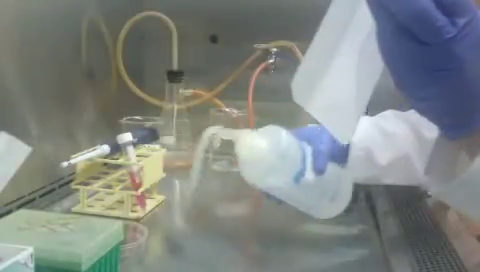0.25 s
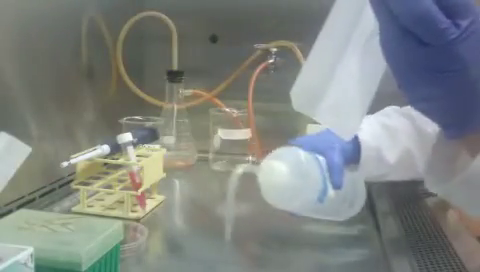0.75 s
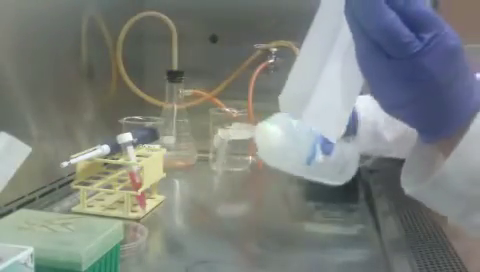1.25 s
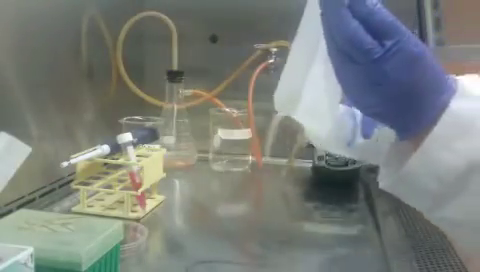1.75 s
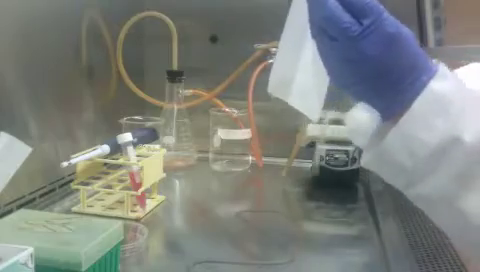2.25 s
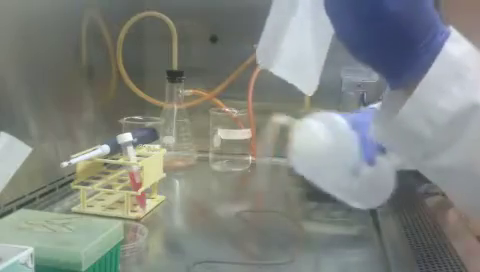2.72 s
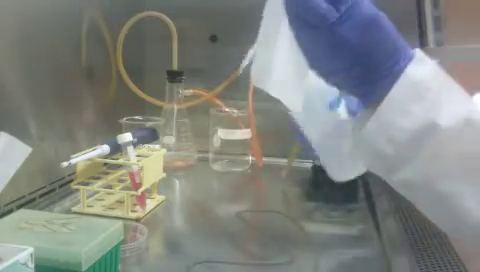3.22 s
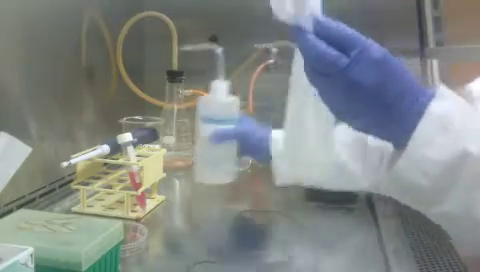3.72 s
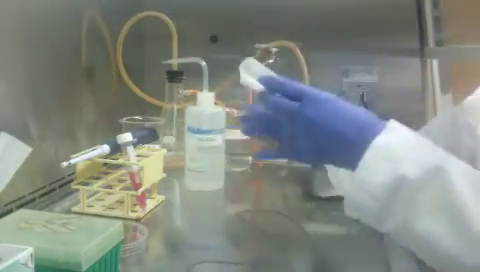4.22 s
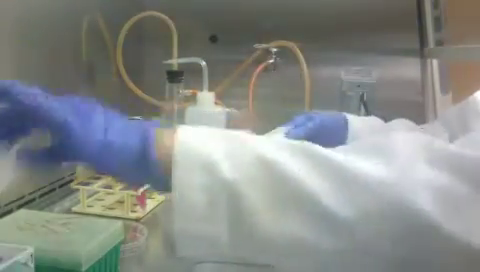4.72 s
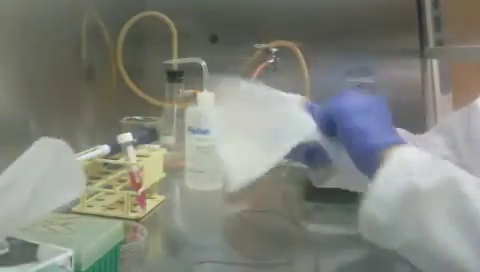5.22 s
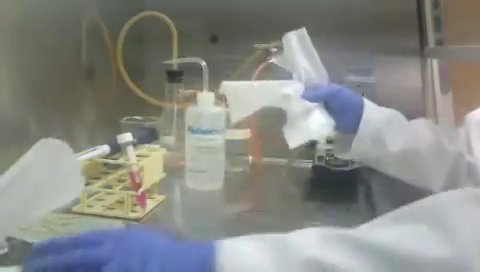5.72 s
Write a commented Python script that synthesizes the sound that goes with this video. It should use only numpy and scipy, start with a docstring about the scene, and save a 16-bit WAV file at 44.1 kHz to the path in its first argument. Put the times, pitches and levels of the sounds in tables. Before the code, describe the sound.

A fan rushes steadily inside a steel lab cabinet. Close by, a plastic wash bottle sputters and spits, liquid patters faintly on the work surface, and air bubbles back in through the nozzle. The bottle is set down hard, and the steel booms loudly enough to overload the microphone. A paper towel then rustles in three quick pulls and scrapes briefly across the surface.

```python
"""Over the rush of a steel lab cabinet's fan, a wash bottle sputters as air and liquid leave its nozzle,
squirts onto the work surface and gulps air back in a froth of bubbles. The bottle is put down hard and the
steel sheet booms, overloading the microphone. Then a paper towel is pulled three times, its fibres rustling and
its taut sheet drumming, and is rubbed across the surface; a gloved hand drags over the steel with a chatter and
a scrape."""
import sys
import numpy as np
from scipy import signal
from scipy.fft import rfft, irfft, next_fast_len
from scipy.io import wavfile
from scipy.ndimage import uniform_filter1d

SR = 44100
rng = np.random.default_rng(int(sys.argv[2]) if len(sys.argv) > 2 else 0)


def log_audio(samples):
    """Write samples as a 16-bit WAV file to the path given in sys.argv[1]."""
    # one column per channel
    frames = np.atleast_2d(samples).T
    # limit to full scale, then quantise
    limited = np.clip(frames, -1, 1)
    pcm = np.round(limited * 32767).astype(np.int16)
    wavfile.write(sys.argv[1], SR, pcm)


N = 263277
TIME = np.arange(N) / SR


def sputter():
    """Air and liquid leave the nozzle in uneven bursts, swelling as the squeeze builds."""
    # sputter spectrum: f/Hz, level/dB per Hz
    spectrum = [(100, -29), (200, -16), (340, -2.5), (520, -0.5), (800, -6), (1200, -8.5), (1700, -1.5),
                (2200, -8.5), (3100, -3), (4600, -13.5), (9000, -15.5), (12000, -23.5), (15500, -38)]
    start_s, length_s, final_db, swell_db_per_s = .5474, .1042, -21, 110
    jump_s, jump_db = .028, 7  # the flow breaks through in two jumps
    bursts = unit(grains(rate=7000, spread_db=0))
    bursts += pings(rate=2500, lo_hz=290, hi_hz=15500, cycles=15, glide=.05, spread_db=0)
    surges = undb(2.2 * walk(330))
    elapsed = np.clip(TIME - start_s, 0, length_s)
    jumps_left = np.maximum(2 - elapsed // jump_s, 0)
    squeeze = undb(final_db - swell_db_per_s * (length_s - elapsed) - jump_db * jumps_left)
    envelope = squeeze * stroke(start_s, length_s, attack_s=.006, release_s=.034)
    return colour(bursts * surges, spectrum) * envelope


def jet():
    """The thin jet hisses on the steel as a fine spray."""
    # squirts: t/s, length/s, level/dB
    squirts = [(0.836, .01, -45), (1.647, 0.041, -63), (2.057, .09, -64), (2.33, 0.32, -67)]
    flow = sum(undb(db) * stroke(s, length, attack_s=.091, release_s=.067) for s, length, db in squirts)
    return unit(cut(grains(rate=9000, spread_db=2.5), [3500, 12000], "bandpass")) * flow


def drops():
    """Drops patter faintly on the steel while the bottle is in use."""
    patter = pings(rate=260, lo_hz=1500, hi_hz=10000, cycles=40, glide=.02, spread_db=3)
    return patter * undb(-69.5) * stroke(1.0, length_s=1.63, attack_s=.5, release_s=.5)


def gulp():
    """Air drawn back into the bottle: a froth of chirping bubbles swells and dies away."""
    # gulp spectrum: f/Hz, level/dB per Hz
    spectrum = [(600, -26), (1150, -3.5), (1560, 1), (2200, -4.5), (2950, -2.5), (4000, -15), (5500, -16.5),
                (7000, -25), (10000, -33), (13000, -43)]
    froth = pings(rate=2600, lo_hz=1100, hi_hz=12000, cycles=28, glide=.04, spread_db=3)
    return colour(froth, spectrum) * undb(-36) * stroke(3.29, length_s=0, attack_s=.13, release_s=.24)


def spits():
    """Air pockets blow out of the nozzle, each a wet pop with a bright spray."""
    # air pockets: t/s, level/dB, centre f/Hz, spray against the pop/dB, t60/s
    pockets = [(.576, -30.5, 3230, -6.5, 0.038), (.707, -34, 3000, 5.5, 0.14),
               (.843, -27, 4890, -10, 0.062), (.852, -29, 3220, 7.5, .051), (1.004, -27.5, 4040, -6, 0.053),
               (2.053, -43, 1840, -20, 0.086)]
    out = np.zeros(N)
    for s, db, hz, spray_db, t60 in pockets:
        spray = unit(cut(rng.standard_normal(SR // 5), [5350, 11300], "bandpass"))
        spit = pop(hz, width=.38, splash_db=-3.5) + undb(spray_db) * spray
        add(out, s, undb(db) * dying(spit, t60))
    return out


def bubbles():
    """Single bubbles burst in the nozzle and tube with narrow, pitched pops."""
    # bursts: t/s, level/dB, centre f/Hz
    bursts = [(.086, -47.5, 2610), (2.45, -28.5, 7300), (3.005, -44, 2100), (3.091, -30.5, 2690),
              (3.178, -36, 1800), (3.242, -35, 2000), (3.211, -34, 5280), (3.213, -33, 1940),
              (3.259, -41, 5560), (3.277, -29, 2400), (3.293, -25.5, 2800), (3.294, -38, 5200)]
    out = np.zeros(N)
    for s, db, hz in bursts:
        add(out, s, undb(db) * dying(pop(hz, width=.14, splash_db=-12), t60=.043))
    return out


def wall_thump():
    """The squeezed bottle wall flexes with one low, damped note."""
    start_s, db, hz, t60 = .723, -23.5, 281, .066
    out, size = np.zeros(N), SR // 5
    flex = np.sin(2 * np.pi * hz * TIME[:size]) * fade(t60, size)
    add(out, start_s, undb(db) * flex)
    return out


def wash_bottle():
    """All the bottle's squeezing and breathing, thinned in the bass, between the cabinet walls."""
    bottle = sputter() + jet() + drops() + gulp() + spits() + bubbles() + wall_thump()
    return cabinet(cut(bottle, 184, "highpass"), wet_db=-3)


def steel(clear_db):
    """The work surface rings from one blow: clear modes over a crowd of close ones, treble dying first."""
    # clear modes: f/Hz, level/dB, t60/s
    clear_modes = [(102, -11.5, 0.74), (159, -5.5, 0.475), (206.4, -3.5, 0.42), (246.7, -0.5, 0.3),
                   (271, 2.5, 0.42), (405.5, -9.5, 0.55), (454, -13.5, 0.45), (522, -8, 0.39),
                   (636, -1.5, 0.21), (717, -8, 0.44), (751, -12, 0.38), (850.7, -6.5, 0.66),
                   (878, -22.5, 1.4), (1008, -14, 0.43), (1189, 1, 0.3), (1322, -7, 0.24), (2400, -11, .27),
                   (2618, -5, 0.27)]
    # crowd of close modes: f/Hz, level/dB per Hz, t60/s
    close_modes = [(30.2, -40, 0.41), (60, -12, 0.7), (109, -8, 0.73), (236, -1.5, 0.62), (410, -2.5, 0.46),
                   (654, -4.5, 0.43), (985, -4.5, 0.38), (1600, -8.5, 0.29), (2850, -8.5, 0.28),
                   (5050, -12.5, 0.25), (9500, -11.5, 0.13), (12900, -15.5, 0.077), (16000, -29.5, 0.16)]
    size, edges_hz = SR, np.geomspace(28, 17000, 27)
    crowd, power = 0, 0
    for lo, hi in zip(edges_hz, edges_hz[1:]):
        hz = np.sqrt(lo * hi)
        weight = undb(along(hz, close_modes)) * np.sqrt(hi - lo)
        band = unit(cut(rng.standard_normal(size), [lo, hi], "bandpass", order=3))
        crowd += weight * band * fade(along(hz, close_modes, column=2), size)
        power += weight ** 2
    clear = sum(undb(db) * np.sin(2 * np.pi * hz * TIME[:size]) * fade(t60, size)
                for hz, db, t60 in clear_modes)
    return crowd / np.sqrt(power) + undb(clear_db) * clear


def blows(contacts, low_cut_hz):
    """Contacts on the work surface; a softer one leaves the treble out, a lighter one the bass."""
    out = np.zeros(N)
    for s, db, brightness_hz in contacts:
        add(out, s, undb(db) * cut(steel(clear_db=-9), brightness_hz, "lowpass"))
    return cut(out, low_cut_hz, "highpass", order=3)


def knocks():
    """The bottle lands and rocks, booming the steel; later a hand bumps the steel with a soft, low thud."""
    # hard and soft contacts: t/s, level before filtering/dB, low-pass f/Hz
    contacts = [(3.961, -13, 2500), (3.968, -8, 12100), (3.974, -7.5, 16000), (3.985, -7, 11900),
                (3.998, -11.5, 5000), (5.17, -41, 210)]
    return blows(contacts, low_cut_hz=85)


def splats():
    """Liquid slaps the steel: soft, light contacts with a dull ring."""
    # wet slaps: t/s, level before filtering/dB
    slaps = [(.724, -37), (.853, -40.5), (0.916, -43), (1.014, -39.5), (2.06, -45.5), (2.14, -41),
             (2.334, -42.5), (2.53, -48.5)]
    brightness_hz = 840
    return blows([(s, db, brightness_hz) for s, db in slaps], low_cut_hz=218)


def paper_fibres():
    """Fibres snap in clusters and small folds crinkle; gives a steady crackle and the hiss above it."""
    # paper spectrum: f/Hz, level/dB per Hz
    spectrum = [(530, -17.5), (900, 0), (955, -8.5), (1260, -5.5), (1470, -6.5), (2120, -4), (2450, -2.5),
                (3460, -1), (4770, -8.5), (5180, -9), (8550, -16), (9860, -12), (15500, -35)]
    jerks = undb(1.54 * walk(200))
    snaps = unit(grains(rate=9000, spread_db=3.5))
    folds = pings(rate=2200, lo_hz=913, hi_hz=15030, cycles=34, glide=0, spread_db=.5)
    fibres = colour((snaps + undb(-2.5) * folds) * jerks, spectrum)
    crackle = unit(cut(fibres, [900, 6000], "bandpass", order=3))
    hiss = unit(cut(fibres, 5800, "highpass", order=3))
    return crackle, hiss


def paper_drum():
    """Countless tugs make the taut sheet drum; it stiffens as it moves, evening out its largest swings."""
    # paper sheet modes: f/Hz, width/Hz, level/dB
    modes = [(167, 47, -13), (368, 50, -11), (408, 46, -6.5), (519, 31, -1), (642, 43, 2), (697, 36, -7.5),
             (875, 66, -35), (1214, 31, -13)]
    tugs = cut(grains(rate=4000, spread_db=2), [300, 1300], "bandpass")
    swing = np.tanh(.6 * unit(ring(tugs, modes)))
    return unit(cut(swing, 120, "highpass"))


def towel():
    """In each pull the paper catches, rustles and drums, then whips free."""
    # pulls: t/s, length/s, level/dB, attack/s, release/s, drumming against the crackle/dB
    pulls = [(4.366, 0.083, -31.5, 0.028, 0.046, -15.5), (4.82, 0.15, -23, 0.057, 0.076, 8),
             (5.35, 0.03, -35.5, 0.11, 0.11, -11)]
    hiss_db, hiss_rise_db, crackle_fall_db, drum_arch_db = -2.5, 1, .5, 5.5
    catch_lead_s, catch_db = .0096, -6
    taut_pitch, pitch_sag = 1.04, .09  # shares of the resting pitch
    crackle, hiss = paper_fibres()
    drumming = paper_drum()
    rustle, drum = 0, 0
    for s, length, db, attack, release, drum_db in pulls:
        progress = np.clip((TIME - s) / length, 0, 1)
        whip = progress ** 4
        paper = crackle * undb(-crackle_fall_db * (progress - .5))
        paper += hiss * undb(hiss_db + hiss_rise_db * whip)
        catch = undb(catch_db) * stroke(s - catch_lead_s, length_s=0, attack_s=.0037, release_s=.023)
        rustle += undb(db) * (paper * stroke(s, length, attack, release) + crackle * catch)
        # the sheet sinks in pitch as it slackens and drums hardest in mid-pull
        sagging_time = np.cumsum(taut_pitch - pitch_sag * progress) / SR
        sheet = np.interp(sagging_time, TIME, drumming, period=N / SR)
        arch = undb(drum_db - drum_arch_db * (2 * progress - 1) ** 2)
        drum += undb(db) * arch * sheet * stroke(s, length, attack_s=.067, release_s=.095)
    return cabinet(rustle, wet_db=-9.5) + drum


def wipe():
    """A gloved hand lands on the steel: it chatters as it lands and scrapes briefly as it is pushed off."""
    # scrape spectrum: f/Hz, level/dB per Hz
    spectrum = [(88, -55), (150, -27), (239, -0.5), (550, -12), (668, -9), (1020, -38), (1170, -17),
                (1540, 0.5), (1940, -12.5), (3100, 1), (3760, -8), (9920, -15), (14300, -29), (15500, -43)]
    # chatter resonances: f/Hz, width/Hz, level/dB
    resonances = [(513, 36, 1.5), (710, 140, 5), (1175, 57, -1.5), (2610, 240, 3), (3340, 320, -2)]
    land_s, push_delay_s = 5.817, .013
    slips = grains(rate=2500, spread_db=0) * undb(3.4 * walk(90))
    push = undb(-26) * stroke(land_s + push_delay_s, length_s=.017, attack_s=.033, release_s=.078)
    slide = undb(-33.5) * stroke(land_s, length_s=0, attack_s=.02, release_s=.43)
    scrape = colour(slips, spectrum) * push
    chatter = unit(cut(ring(slips, resonances), [300, 4000], "bandpass")) * slide
    return scrape + chatter


def ticks():
    """Plastic and paper creases give short, bright snaps with no bass."""
    # snaps: t/s, level of the first 10 ms/dB, high-pass f/Hz, t60/s
    snaps = [(.058, -30.5, 10200, 0.0024), (4.056, -27, 6000, 0.15), (4.264, -44.5, 8460, 0.1),
             (5.196, -39, 1460, 0.071)]
    out, size = np.zeros(N), SR // 5
    for s, db, hz, t60 in snaps:
        snap = rng.standard_normal(size) * fade(t60, size)
        snap = cut(cut(snap, hz, "highpass", order=8), 8200, "lowpass")
        onset_rms = np.sqrt(np.mean(snap[:SR // 100] ** 2))
        add(out, s, undb(db) * snap / onset_rms)
    return cabinet(out, wet_db=-12)


def brushing():
    """Sleeve and towel brush softly with each reach of the arm."""
    # reaches: t/s, length/s, level/dB
    reaches = [(3.843, 0.47, -50.5), (4.545, 0.41, -47.5), (5.089, 0.052, -44), (5.254, 0.27, -49)]
    # brushing spectrum: f/Hz, level/dB per Hz
    spectrum = [(80, -7), (200, 14.5), (450, -1), (800, 2.5), (1500, -2), (3200, 0), (6000, -4.5),
                (10000, -11), (15500, -31)]
    motion = sum(undb(db) * stroke(s, length, attack_s=.17, release_s=.27) for s, length, db in reaches)
    friction = grains(rate=6000, spread_db=6) * undb(.98 * walk(37))
    return colour(friction, spectrum) * motion


def fan():
    """A bed of rushing air that wavers a little, with quickly fluttering tones from the blower."""
    # air spectrum: f/Hz, level/dB per Hz
    spectrum = [(25, -64), (45, -14), (70, -13.5), (160, 0.5), (240, -1.5), (330, -8), (600, -15),
                (1050, -12.5), (1500, -19), (2800, -20), (5000, -24.5), (8000, -28), (11000, -35),
                (15500, -51)]
    # blower tones: f/Hz, wander/Hz, level/dB
    whine = [(245.7, 4.8, -59), (1095, 14.2, -65), (4126, 14, -65), (5330, 26, -72.5), (7600, 74, -73),
             (12250, 40, -84)]
    # recorder gain on the fan's rush and whine, quieter at first, then settling: t/s, level/dB
    gain_curve = [(0, -52.5), (.5, -55), (.7, -49.5), (2.4, -50), (2.9, -51), (3.6, -49), (5.97, -50.5)]
    air = colour(rng.standard_normal(N), spectrum) * undb(1.23 * walk(31))
    tones = 0
    for hz, wander, db in whine:
        phase = 2 * np.pi * np.cumsum(hz + wander * walk(110)) / SR
        flutter = undb(3 * walk(55))
        tones += undb(db) * unit(np.sin(phase) * flutter)
    recorder_gain = gain(gain_curve)
    return air * recorder_gain + tones * unit(recorder_gain)


def cabinet(x, wet_db):
    """Close steel walls: four early reflections colour the sound and a short echo follows."""
    size, t60, predelay_s = SR // 3, .15, .002
    tail = rng.standard_normal(size) * fade(t60, size) * (TIME[:size] > predelay_s)
    walls = tail / np.linalg.norm(tail)
    early = rng.integers(SR // 2000, SR // 200, size=4)
    walls[early] += .47 * rng.choice([-1, 1], size=4)
    echo = signal.fftconvolve(x, walls / np.linalg.norm(walls))[:N]
    return (x + undb(wet_db) * echo) / np.sqrt(1 + undb(2 * wet_db))


def pop(hz, width, splash_db):
    """Noise rings in a small wet cavity, inside a broad splash; width is a share of the centre pitch."""
    burst = rng.standard_normal(SR // 5)
    cavity = unit(cut(burst, [hz * (1 - width / 2), hz * (1 + width / 2)], "bandpass"))
    splash = unit(cut(cut(burst, hz / 3, "highpass"), hz + 2500, "lowpass", order=5))
    return cavity + undb(splash_db) * splash


def pings(rate, lo_hz, hi_hz, cycles, glide, spread_db):
    """Tiny ringing grains, rate per second, each with its own pitch, which glide bends up as it dies."""
    candidates = 24000
    at, pitch, chance = rng.random((candidates, 3)).T
    strength = undb(spread_db * rng.standard_normal(candidates).clip(-2, 2))
    heard = chance < rate * N / SR / candidates
    hz = lo_hz + (hi_hz - lo_hz) * pitch[heard, None]
    step = np.arange(SR // 120)
    turns = hz * step / SR
    age = turns / cycles
    chirp = np.sin(2 * np.pi * turns * (1 + glide * np.minimum(age, 2) / 2))
    decay = np.exp(-np.pi * age) * (1 - step / len(step))
    sound = strength[heard, None] * np.sqrt(hz) * decay * chirp
    where = (at[heard, None] * (N - len(step))).astype(int) + step
    return unit(np.bincount(where.ravel(), sound.ravel(), N))


def grains(rate, spread_db):
    """Tiny snaps of unequal size at random moments, rate per second."""
    snaps = (rng.random(N) < rate / SR) * rng.choice([-1, 1], N)
    return snaps * undb(spread_db * rng.standard_normal(N).clip(-2, 2))


def walk(rate):
    """Random drift with rate turns per second and a spread near 1."""
    hold = int(SR / rate)
    steps = np.repeat(rng.standard_normal(N // hold + 1), hold)
    return unit(uniform_filter1d(steps, hold))[:N]


def stroke(s, length_s, attack_s, release_s):
    """Envelope of one movement: rises 30 dB per attack until s, holds, falls 30 dB per release."""
    outside = np.maximum(s - TIME, 0) / attack_s + np.maximum(TIME - s - length_s, 0) / release_s
    return undb(-30 * np.minimum(outside, 8))


def dying(x, t60):
    """Shape a steady sound into a burst that opens in about a millisecond and dies away."""
    shape = (1 - np.exp(-TIME[:len(x)] / .0011)) * fade(t60, len(x))
    return unit(x * shape) * np.std(x) * np.sqrt(np.mean(shape ** 2))


def fade(t60, size):
    """Exponential decay, 60 dB in t60 seconds."""
    return undb(-60 * np.arange(size) / SR / t60)


def ring(x, modes):
    """Drive resonances (f/Hz, width/Hz, level/dB), each to its own level."""
    return sum(undb(db) * unit(signal.lfilter(*signal.iirpeak(hz, hz / width, SR), x))
               for hz, width, db in modes)


def colour(x, spectrum):
    """Give a steady texture a spectrum; rms 1."""
    size = next_fast_len(len(x))
    eq = undb(along(np.fft.rfftfreq(size, 1 / SR), spectrum))
    return unit(irfft(rfft(x, size) * eq, size)[:len(x)])


def cut(x, hz, kind, order=2):
    """Low-, high- or band-pass."""
    return signal.sosfilt(signal.butter(order, hz, kind, fs=SR, output="sos"), x)


def along(hz, rows, column=1):
    """Read a column of a table on a log-frequency axis."""
    rows = np.array(rows)
    return np.interp(np.log(hz + 1), np.log(rows[:, 0]), rows[:, column])


def gain(rows):
    """A level curve (t/s, level/dB) as a gain."""
    return undb(np.interp(TIME, *np.transpose(rows)))


def add(track, s, sound):
    """Mix a sound in at s seconds."""
    start = int(s * SR)
    track[start:start + len(sound)] += sound[:N - start]


def undb(db):
    """Decibels to gain."""
    return 10 ** (np.asarray(db) / 20)


def unit(x):
    """Scale to rms 1."""
    return x / np.sqrt(np.mean(x ** 2))


def scene():
    """Everything inside the cabinet, heard at one point."""
    mix = knocks() + splats() + fan() + wash_bottle() + ticks() + towel()
    rubbing = cabinet(brushing() + wipe(), wet_db=-2)
    return (mix + rubbing)[None]


def record(dry):
    """The microphone overloads on the knock; the deepest bass and the top are cut off."""
    ceiling, low_hz, top_hz = .95, 51.7, 15950
    rounded = dry / (1 + (dry / ceiling) ** 6) ** (1 / 6)
    rounded = cut(rounded, low_hz, "highpass")
    return signal.sosfilt(signal.ellip(10, .1, 70, top_hz, fs=SR, output="sos"), rounded)


dry = scene()
out = record(dry)
log_audio(out)
```